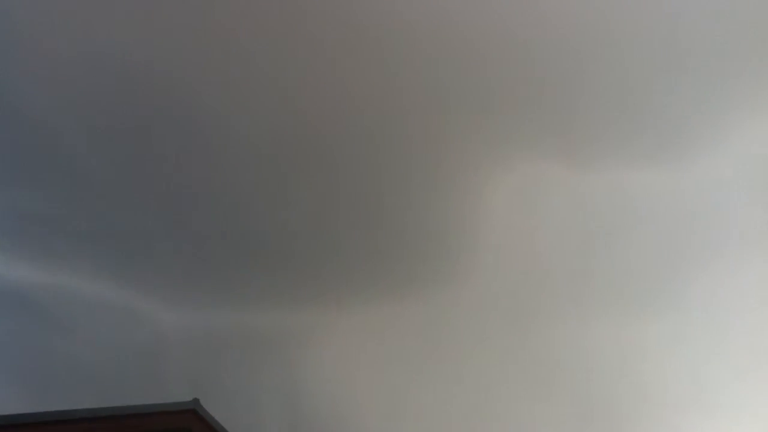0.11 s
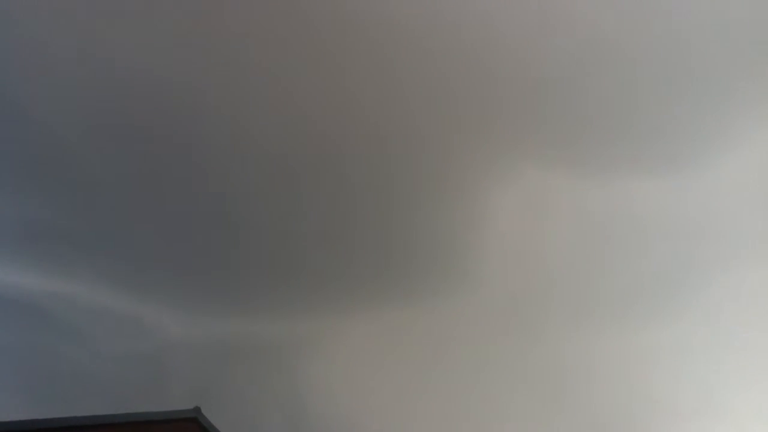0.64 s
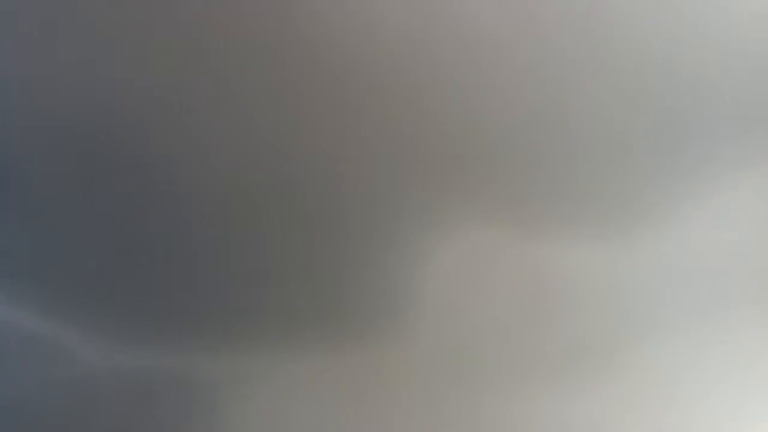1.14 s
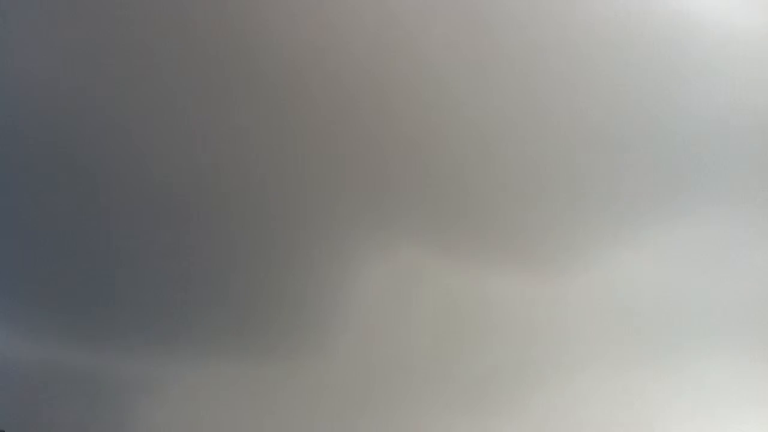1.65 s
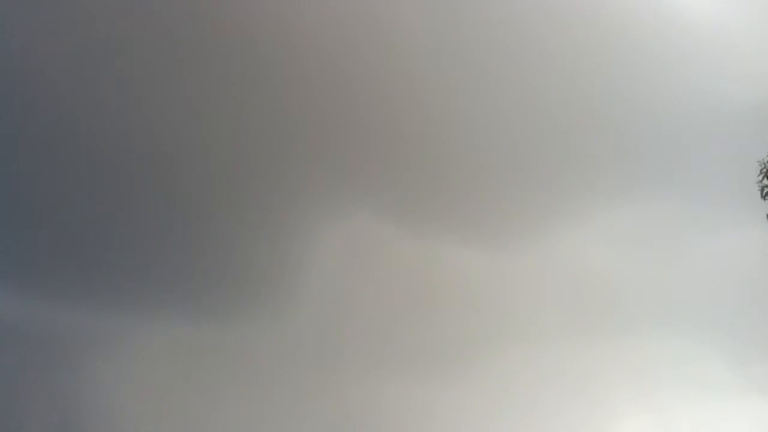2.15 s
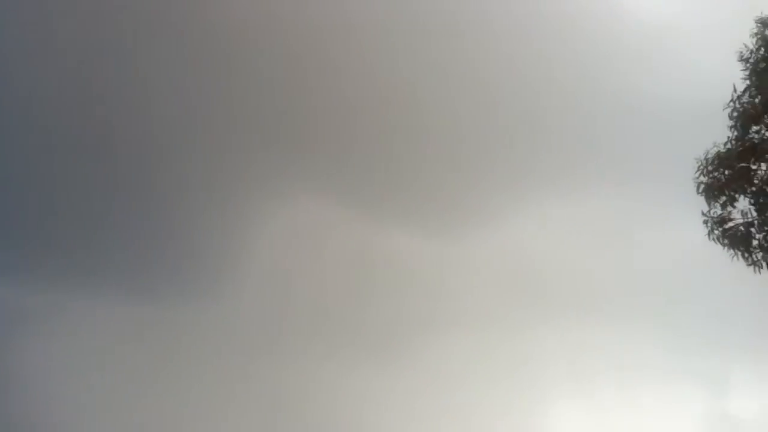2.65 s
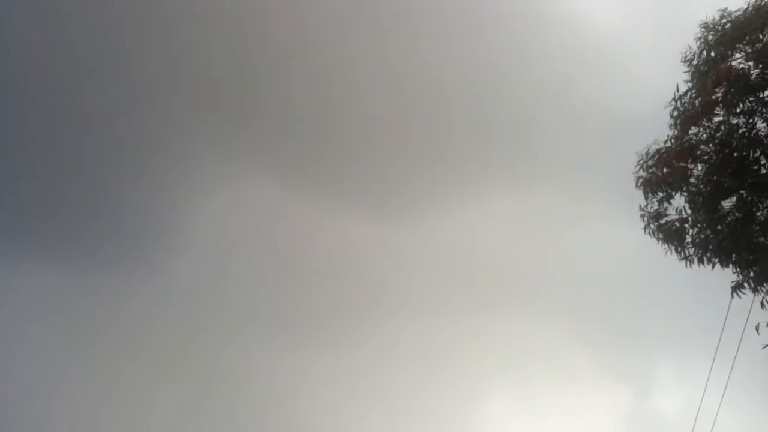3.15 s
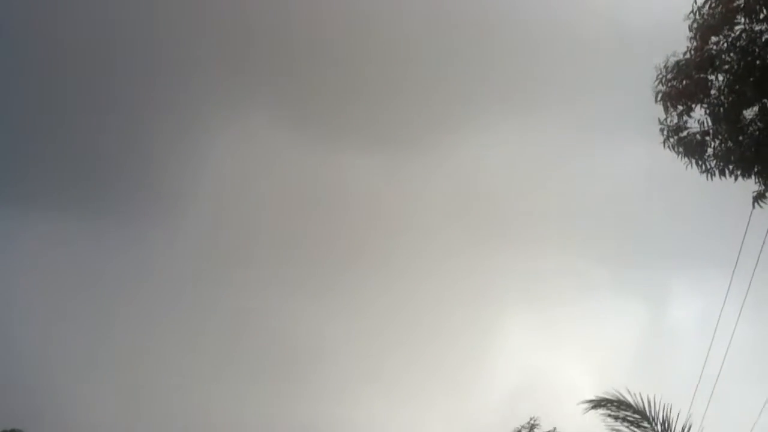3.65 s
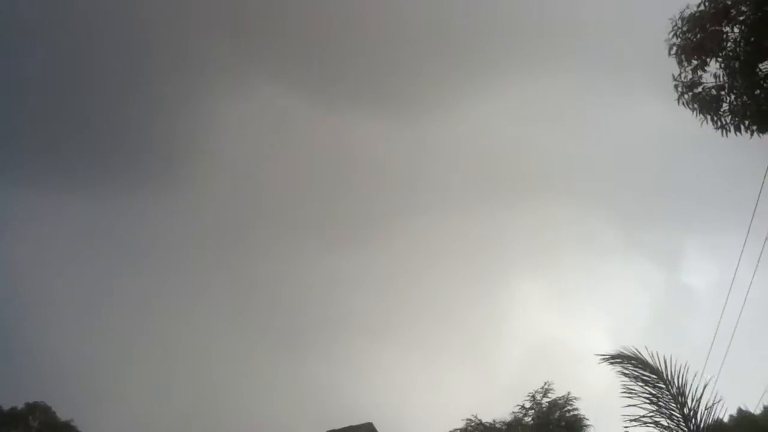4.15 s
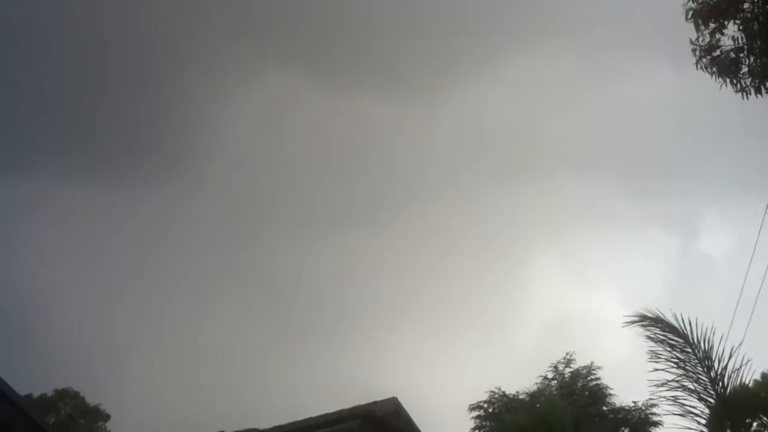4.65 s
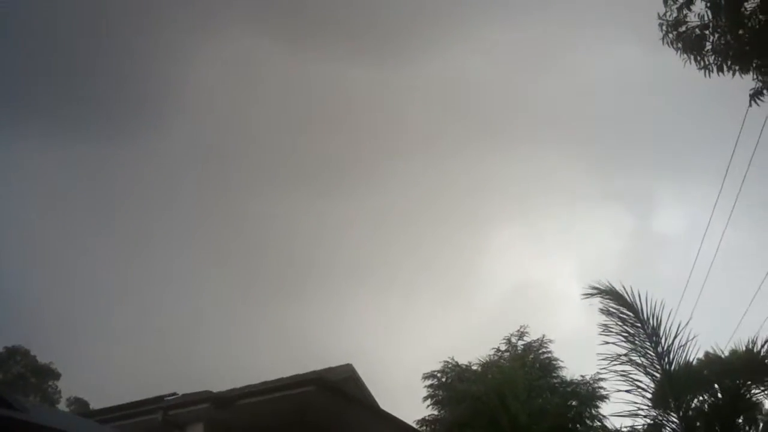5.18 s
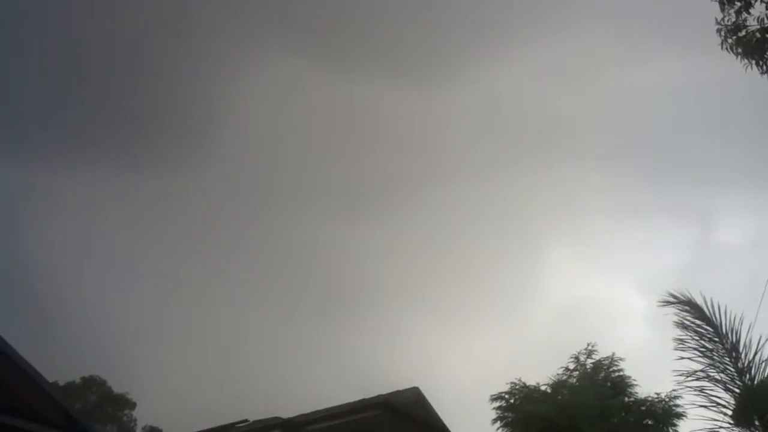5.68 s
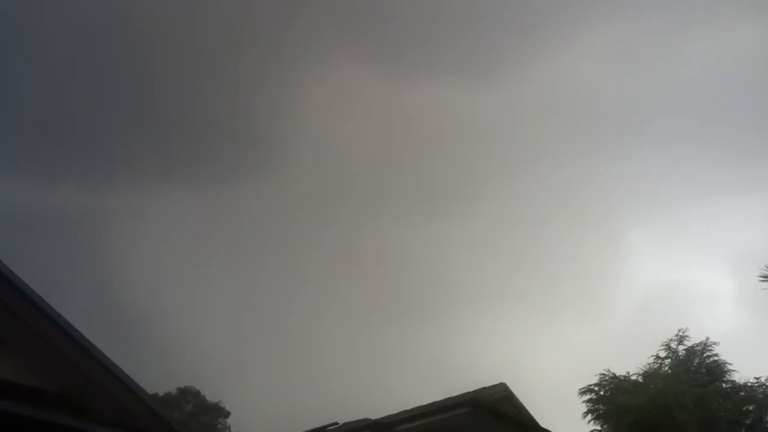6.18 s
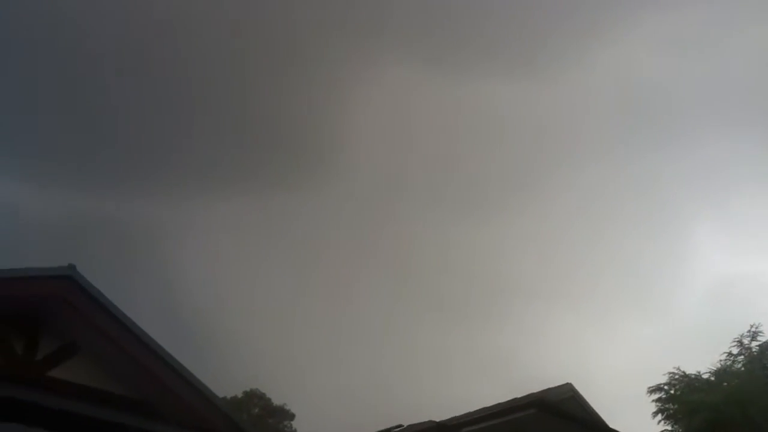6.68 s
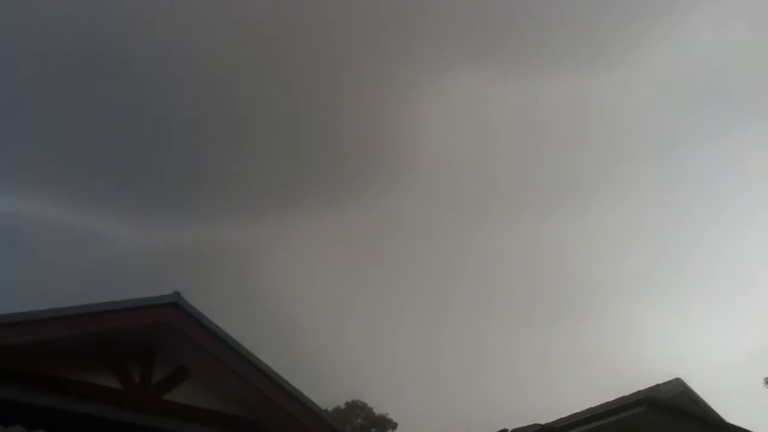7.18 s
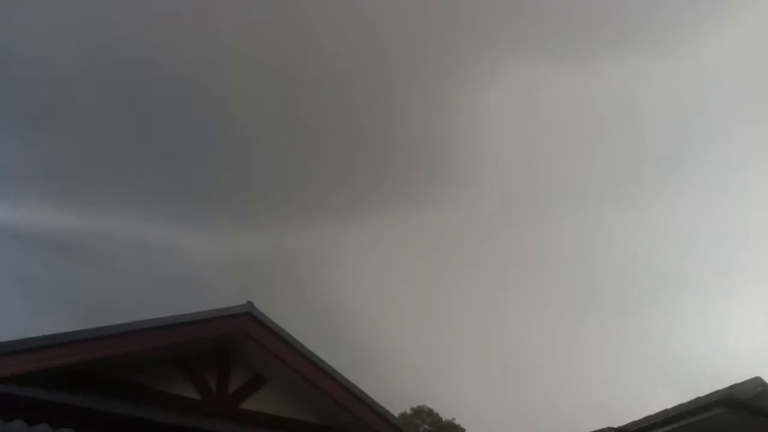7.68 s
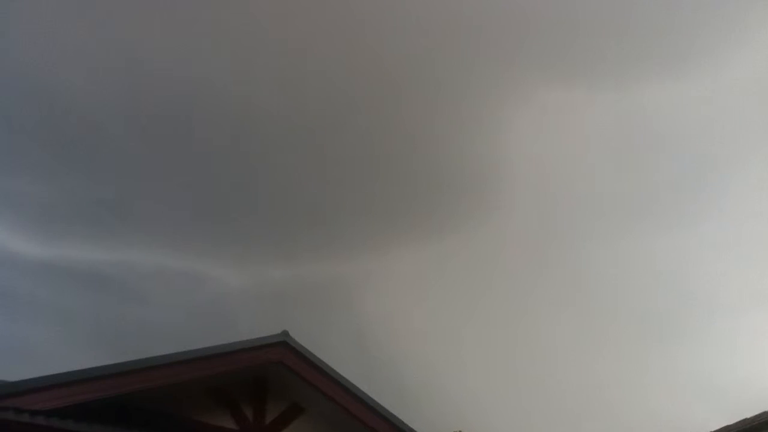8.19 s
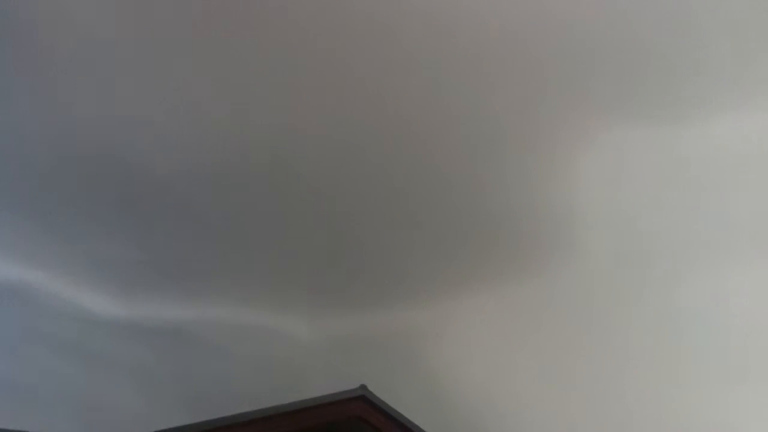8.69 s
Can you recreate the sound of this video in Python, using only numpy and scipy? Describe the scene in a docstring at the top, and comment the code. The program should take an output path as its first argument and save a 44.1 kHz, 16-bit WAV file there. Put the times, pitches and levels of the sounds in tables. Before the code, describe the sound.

Small parrots screech, squawk, whistle and trill in suburban trees while gusty wind rumbles and thumps hard on a bare microphone, then eases.

```python
"""A flock of small parrots in suburban trees, heard through a bare microphone in gusty wind over a traffic hum.
It opens with screeches and squawks under a faint far siren that ends by 1.8 s; whistles, coos and rasps join in.
Gusts, made of sped-up or slowed turbulence, buffet hardest near 3.7 s; a trill and a long rattle follow by 4.3 s.
Then the wind thins, swoops and sparse calls sound, a swish passes at 7.5 s and loud calls return from 8 s.
Clear calls are stacks of gliding harmonics; screeches have staggering pitch and noise; all birds get echoes."""
import sys
import numpy as np
from scipy import signal
from scipy.fft import rfft, irfft
from scipy.io import wavfile
from scipy.ndimage import uniform_filter1d

SR = 44100
rng = np.random.default_rng(int(sys.argv[2]) if len(sys.argv) > 2 else 0)


def field_ratio(decibels):
    """Amplitude ratio for a level in dB (20 dB per decade); scalars and array-likes work."""
    return 10 ** (np.asarray(decibels, dtype=float) / 20)


def master_out(mix):
    """Clip the mix to full scale and print it as 16-bit PCM to the path in sys.argv[1]."""
    frames = np.transpose(np.atleast_2d(mix))
    ceiling = np.clip(frames, -1, 1)
    pcm = np.round(ceiling * 32767).astype(np.int16)
    wavfile.write(sys.argv[1], SR, pcm)


N = 388962


def evened(x):
    """Scales to rms 1."""
    return x / np.sqrt(np.mean(x ** 2) + 1e-20)


def read(points, hz):
    """Reads a spectrum on a log-frequency axis."""
    f, value = np.transpose(points)
    return np.interp(np.log(hz + 1), np.log(f + 1), value)


def columns(rows):
    """Draws a table as curves: returns its start time, then each other column per sample."""
    s, *rest = np.transpose(rows)
    t = np.arange(s[0], s[-1], 1 / SR)
    return [s[0]] + [np.interp(t, s, c) for c in rest]


def add(mix, s, sound):
    """Mixes a sound in at s seconds."""
    at = round(s * SR)
    sound = sound[max(-at, 0):]
    part = mix[max(at, 0):][:len(sound)]
    part += sound[:len(part)]


def faded(size, seconds):
    """Level shape whose fade-in and fade-out last the given seconds together."""
    return signal.windows.tukey(size, min(seconds * SR / size, 1))


def coloured(points, size):
    """Noise of rms 1 with the given spectrum."""
    hz = np.fft.rfftfreq(size, 1 / SR)
    spectrum = rfft(rng.standard_normal(size)) * field_ratio(read(points, hz))
    return evened(irfft(spectrum, size))


def wobble(size, ms):
    """Smooth random curve of about rms 1: noise averaged twice over ms."""
    span = max(round(ms * SR / 1000), 1)
    smooth = uniform_filter1d(uniform_filter1d(rng.standard_normal(size), span), span)
    return smooth * np.sqrt(1.23 * span)


def resonate(x, hz, width):
    """Band-pass: shifts the curve hz down to zero, smooths, and shifts back."""
    turn = np.exp(2j * np.pi * np.cumsum(hz * np.ones(len(x))) / SR)
    r = np.exp(-np.pi * width / SR)
    smooth = signal.lfilter([1 - r], [1, -r], x / turn + 1e-18)
    return 2 * (turn * smooth).real


def partials(hz, size_db, flicker_db, ms):
    """Sums harmonics of the pitch curve at about rms 1; leaves in the path make each one flicker alone."""
    k = np.arange(1, len(size_db) + 1)[:, None]
    size = field_ratio(size_db) * (k * hz < SR / 2.8)  # the highest partials are left out
    chance = np.array([wobble(len(hz), ms) for _ in k])
    flicker = field_ratio(flicker_db * k ** 0.54 * chance)  # higher partials flicker more
    waves = np.cos(2 * np.pi * k * np.cumsum(hz) / SR)
    return (size * flicker * waves).sum(0) / np.sqrt((size ** 2).sum(0) / 2 + 1e-20)


def screech(s, length, peak_db, place, centre_hz, octaves):
    """The syrinx goes chaotic: the pitch staggers about, and ragged air fills the gaps."""
    u = np.linspace(0, 1, round(length * SR))
    size = len(u)
    place = np.clip(place, .02, .98)
    from_peak = np.maximum((place - u) / place, (u - place) / (1 - place))
    db = peak_db - 15.5 * from_peak ** 1.58  # both ends lie 15.5 dB under the peak
    stagger = .2 * wobble(size, 7.6) + 0.0753 * wobble(size, .8)  # octaves
    hz = 1450 * 2 ** np.clip(stagger, -.8, .8)
    k = np.arange(1, 11)[:, None]
    away = np.log2(k * hz / centre_hz) / np.maximum(octaves, .3)
    voice = partials(hz, -12 * away ** 2, 1.2, 3.4)
    air = rng.standard_normal(size)
    for _ in range(2):
        air = resonate(air, centre_hz, 4600 * octaves)
    sound = evened(voice + field_ratio(-7.0) * evened(air))
    return s, field_ratio(db + 1.8 * wobble(size, 11.0)) * sound * faded(size, 0.033)


def screeches():
    """Harsh screeches: bursts of chaotic voice and air, each round its own band."""
    # t/s, length/s, peak level/dB before its wobble, place of the peak (0-1), centre f/Hz, breadth/octaves
    screech_rows = [(0, 0.15, -46.5, 0.05, 4600, 1), (0.156, 0.24, -41, 0.82, 4280, 0.95),
                    (.62, 0.18, -56.5, 0.4, 6960, 0.72), (0.689, 0.16, -50, 0.26, 2600, 0.88),
                    (0.799, 0.3, -52.5, 0.23, 3990, 1.2), (2.779, 0.4, -62, .5, 2280, .5),
                    (1.318, 0.37, -51.5, 0.17, 4900, 0.85), (1.841, 0.16, -48, 0.18, 5200, 0.92),
                    (1.996, 0.27, -46, 0.58, 5300, 0.98), (2.875, 0.54, -59.5, 0.02, 5000, 0.97),
                    (3.301, 0.48, -60.5, 0.18, 4970, .9), (3.598, 0.14, -33, 0.55, 4260, 0.79),
                    (4.117, 0.33, -51, 0, 5100, 1.2), (4.447, 0.14, -47.5, 0.7, 5350, 0.79),
                    (4.615, 0.19, -46.5, 0.9, 4170, 1.15), (5.332, 0.17, -59.5, 0.3, 4700, 0.55),
                    (5.541, 0.11, -47, 0.24, 3680, 1.24), (5.642, 0.14, -46.5, 0.1, 3300, 1),
                    (6.791, 0.31, -56.5, 0.32, 4830, 0.56), (7.324, 0.45, -57.5, 0.06, 4270, 0.85),
                    (7.532, 0.38, -55, 0, 4300, 1.1), (7.968, 0.25, -47, 0.45, 4750, 0.87),
                    (8.346, 0.17, -40.5, 0.43, 4170, 0.92), (8.538, 0.1, -48, 0.23, 4550, 0.98),
                    (8.747, 0.079, -46, 0, 4730, .7)]
    return [screech(*row) for row in screech_rows]


def siren():
    """A far wail: a gliding sine, blurred in pitch and level by echoes and moving air."""
    # t/s, f/Hz, level/dB, both before their wobble
    siren_curve = [(0, 914, -47), (.25, 820, -59.5), (.6, 733, -64), (.85, 769, -62), (1.0, 864, -57),
                   (1.5, 1175, -61.5), (1.75, 1242, -70)]
    s, hz, db = columns(siren_curve)
    size = len(hz)
    tone = np.sin(2 * np.pi * np.cumsum(hz * (1 + 0.0045 * wobble(size, 16))) / SR)
    level = np.sqrt(2) * field_ratio(db + 5.8 * wobble(size, 24))
    return s, level * tone * signal.windows.tukey(size, .1)


def airflow(eddies):
    """Steady turbulence on the microphone, with a restless level."""
    # t/s, level/dB before its wobble
    flow_curve = [(0, -23), (.22, -37), (.37, -33), (.52, -22), (.71, -30.5), (1.28, -45), (1.5, -33.5),
                  (1.79, -41), (2.05, -32.5), (2.33, -40), (2.55, -30.5), (2.95, -40), (3.41, -39.5),
                  (3.71, -31), (3.95, -52), (4.15, -32.5), (4.47, -31.5), (4.9, -48.5), (5.33, -45),
                  (6.1, -62), (6.83, -52), (7.7, -48), (7.98, -44), (8.82, -48)]
    s, db = columns(flow_curve)
    return s, field_ratio(db + 3.42 * wobble(len(db), 19.0)) * eddies[:len(db)]


def buffets(eddies):
    """Gusts sweep eddies past the microphone: faster air plays the turbulence faster, so brighter."""
    # t of the middle/s, level at the crest/dB, length/ms (fades included, 2.2 times this), air speed/factor
    gust_rows = [(0.035, -17, 13, 0.95), (0.128, -21.5, 34, 0.78), (0.192, -29.5, 36, 0.88),
                 (0.255, -33.5, 22, 1.2), (0.4, -16.5, 23, 0.95), (0.449, -17.5, 16.5, 1.2),
                 (0.547, -18, 36, 1.48), (0.658, -25.5, 19.7, 0.86), (0.72, -36, 14.5, 0.98),
                 (0.765, -30, 18, 0.75), (0.827, -25.5, 35, 0.96), (0.892, -26.5, 21, 1.2),
                 (1.005, -26.5, 14.8, 0.93), (1.044, -26, 16.4, 1.05), (1.205, -29, 34, 0.83),
                 (1.43, -29.5, 19.4, 1.37), (1.506, -27, 26, 0.61), (1.562, -26, 16.4, 1.15),
                 (1.663, -31, 31, 1.47), (1.779, -30.5, 42, 0.94), (1.849, -36.5, 20.4, 1.7),
                 (1.897, -24.5, 12, 1.33), (1.974, -18.5, 14.2, 1.07), (2.022, -25, 21, 1.47),
                 (2.135, -14.5, 18, 1.55), (2.416, -19.5, 15.2, 1.51), (2.509, -27, 33, 1.6),
                 (2.604, -13.5, 24, 1.67), (2.704, -22.5, 33, 1.45), (2.806, -26.5, 22, 1.13),
                 (3.037, -32.5, 17, 0.96), (3.114, -26.5, 22, 1.07), (3.195, -17, 15.7, 1.37),
                 (3.222, -18, 15, 0.64), (3.296, -25.5, 15, 0.68), (3.543, -20.5, 13.2, 1.94),
                 (3.643, -17, 101, 1.59), (3.722, -12, 26, 2.7), (3.91, -15, 23, 1.23),
                 (3.972, -31, 28, 1.23), (4.039, -17.5, 25.5, 1.21), (4.154, -25.5, 17.5, 1.56),
                 (4.238, -23, 18.7, 0.6), (4.271, -21, 23.3, 0.97), (4.35, -20.5, 21.4, 1.08),
                 (4.438, -20.5, 13.7, 2.4), (4.525, -29, 30, 1.17), (4.607, -15, 30.6, 1.89),
                 (4.655, -21, 16.5, 1.37), (4.744, -25, 12.9, 1.48), (4.858, -32.5, 15.2, 1.6),
                 (5.034, -37.5, 35, 1.3), (5.586, -38, 12, 0.8), (5.737, -27, 24, 1.61),
                 (6.835, -32, 21, 1.08), (8.541, -40, 15, 1.13)]
    out = np.zeros(N)
    for (s, db, ms, speed), start in zip(gust_rows, rng.random(len(gust_rows))):
        size = round(2.2 * ms * SR / 1000)
        shape = np.hanning(size)
        place = start * N / 2 + speed * np.arange(size)
        air = np.interp(place, np.arange(N), eddies) * shape
        add(out, s - size / 2 / SR, field_ratio(db) * evened(air) * np.sqrt(np.mean(shape ** 2)))
    return out


def pops():
    """Sharp pressure kicks, most inside hard buffets: a short bump with a dip on each side, of random sign."""
    # t/s, level/dB (the crest is 8.5 dB higher), width/ms (standard deviation of the bell)
    pop_rows = [(0.546, -29, 0.85), (2.1373, -20.5, 0.5), (2.5231, -26, 0.64), (2.598, -20.5, 0.44),
                (2.6194, -24, 0.79), (2.662, -27.5, 0.63), (2.6862, -21.5, 0.56), (3.19, -31.5, 0.52),
                (3.5414, -16, 0.83), (3.594, -32, 0.55), (3.6062, -19.5, 0.44), (3.611, -16, 0.61),
                (3.6141, -11, 0.36), (3.6175, -11, 0.41), (3.629, -7.5, 0.59), (3.642, -7.5, 0.62),
                (3.7053, -35, 0.72), (3.7156, -6, 0.48), (3.7213, -6.5, 0.4), (3.726, -10, 0.6),
                (3.89, -38, 0.93), (3.912, -12, 0.46), (4.03, -24, 0.53), (4.161, -39, 0.58),
                (4.195, -41, 0.73), (4.4384, -10.5, 0.36), (4.6057, -15, 0.49), (4.62, -22, 0.36)]
    out = np.zeros(N)
    t = np.arange(-300, 300) / SR
    for (s, db, ms), side in zip(pop_rows, rng.random(len(pop_rows))):
        u = t * 1000 / ms
        kick = (1 - 0.62 * u ** 2) * np.exp(-u ** 2 / 2)
        add(out, s + t[0], np.sign(side - .5) * field_ratio(db + 8.5) * kick)
    return out


def wind():
    """Low, rumbling turbulence shared by the airflow and the buffets, plus the pops."""
    # spectrum of the turbulence: f/Hz, relative level/dB
    eddy_spectrum = [(20, -15), (50, -0.5), (100, 1.5), (170, -4), (300, -17), (600, -39.5), (1200, -50.5),
                     (3000, -83)]
    eddies = coloured(eddy_spectrum, N)
    out = buffets(eddies) + pops()
    add(out, *airflow(eddies))
    return out


def hum():
    """Far traffic and leaves: steady coloured noise, very slightly breathing."""
    # f/Hz, relative level/dB
    hum_spectrum = [(25, -9), (50, -3.5), (100, -6.5), (200, -8), (300, -7.5), (500, -11), (1200, -13.5),
                    (2060, -23.5), (4230, -27), (8000, -33), (12000, -39), (15600, -43)]
    return field_ratio(-48 + 0.058 * wobble(N, 100)) * coloured(hum_spectrum, N)


def street(x):
    """Foliage scatters the calls almost at once; walls and roofs answer with a longer tail."""
    t = np.arange(SR) / SR
    taps = rng.standard_normal((2, SR)) * (rng.random((2, SR)) < .05)  # sparse random echoes
    fall_s, start_s = np.array([[.09], [.55]]), np.array([[.002], [.015]])  # time to fall by 60 dB; first echo
    near, far = taps * field_ratio(-60 * t / fall_s) * (t > start_s)
    tail = field_ratio(-10) * near / np.linalg.norm(near) + field_ratio(-8.5) * far / np.linalg.norm(far)
    return signal.oaconvolve(x, tail)[:N]


def note(s, hz, db, tilt_db, odd_db, jitter):
    """The syrinx gives a slightly unsteady stack of partials, coloured by the throat."""
    # resonance of the throat: f/Hz, relative level/dB
    throat = [(1000, -8), (2500, -4), (5000, 3), (7500, -0.5), (10000, -10.5), (12500, -20), (15500, -29)]
    # catches, where the pitch drops for a moment: t of the middle/s, share of pitch lost
    catch_rows = [(1.87, 0.31), (1.953, 0.085), (1.978, 0.13), (2.191, 0.12), (2.032, .15), (2.061, 0.092),
                  (2.094, 0.131), (2.122, 0.15), (2.239, 0.22), (4.379, 0.28), (4.427, .28), (4.471, 0.26),
                  (4.521, 0.29), (4.597, 0.26), (4.66, 0.3), (4.706, 0.3), (4.499, 0.096), (4.547, 0.12),
                  (4.582, .12), (4.757, .13), (4.79, .12)]
    size = len(hz)
    t = s + np.arange(size) / SR
    catch = np.zeros(size)
    for at, share in catch_rows:
        u = (t - at) * 1000 / (62 * share)  # 62 ms per share lost: deeper catches last longer
        catch += share * np.cos(np.pi * np.clip(u, -.5, .5)) ** 2
    catch = catch * (hz < 2250)  # only the low, rattling voices catch

    # faint birds sit deeper in the foliage: duller, less steady, and they flicker more
    faint_db = max(-49 - np.max(db), 0)
    jitter = jitter * (1 + .2 * faint_db)
    flicker_db = 1.6 + .35 * faint_db
    hz = hz * (1 - catch) * (1 + jitter / 100 * (wobble(size, 2.18) + 0.36 * wobble(size, 0.44)))

    k = np.arange(1, 9)[:, None]
    tilt_db = tilt_db - 15 * catch - 0.2 * faint_db
    odd_db = odd_db - 25 * catch  # a catch doubles the beat of the membranes
    size_db = read(throat, k * hz) + tilt_db * np.log2(k) + odd_db * (k % 2)
    stack = partials(hz, size_db, flicker_db, 2.6)
    return s, field_ratio(db + 16.4 * catch) * stack * faded(size, 0.0013)


def call(s, length, db, change_db, from_hz, to_hz, odd_db=0, *, haste, arch=0, swell_db, tilt_db, jitter):
    """A note glides between two pitches, steadily or fastest at first, as haste sets."""
    # tilt_db: per octave; jitter: % before faintness adds to it
    u = np.linspace(0, 1, round(length * SR))
    done = 1 - (1 - u) ** haste
    effort = 4 * done * (1 - done)
    hz = (from_hz + (to_hz - from_hz) * done) * (1 + arch * effort)  # an optional arch of effort lifts the pitch
    swell = swell_db * (4 * u * (1 - u) - .5)  # a separate swell shapes the level
    return note(s, hz, db + change_db * u + swell, tilt_db, odd_db, jitter)


def squawks():
    """Nasal squawks: bright stacks whose odd partials are raised or held back."""
    # t/s, length/s, level/dB before the swell, change of level/dB, start f/Hz, end f/Hz, odd partials/dB
    squawk_rows = [(.005, 0.029, -47.5, 1, 2120, 2610, 3), (.03, 0.053, -39, -4, 2530, 2503, -6.5),
                   (.085, 0.037, -40, 0.5, 2350, 2334, -24), (.108, 0.023, -46, 2, 2250, 2520, 9),
                   (.129, 0.086, -37, -3.5, 2540, 2417, -0.5), (.208, 0.039, -39, -10, 2290, 2270, -23),
                   (.245, 0.08, -38.5, 0, 2420, 2484, -22), (1.42, 0.093, -55.5, -2, 2735, 2805, -21),
                   (3.7, 0.035, -35, 2.5, 2555, 2560, -8.5), (3.735, 0.028, -33.5, -1, 2440, 2423, -34),
                   (3.77, 0.085, -43, 3, 2400, 2500, -6.5), (3.862, .03, -40.5, 9, 2430, 2490, -20),
                   (3.89, 0.091, -34, -3, 2490, 2620, -40), (3.99, 0.081, -46, -16, 2610, 2600, -34),
                   (4.085, 0.036, -56, 6, 2520, 3100, -23), (4.24, 0.06, -48, 1, 2360, 2490, -5),
                   (5.42, 0.068, -74.5, 3, 2830, 2750, -18), (7.44, 0.13, -67, 3, 2670, 2910, 9),
                   (7.69, 0.12, -64, -1, 2700, 2930, 14), (8.112, 0.079, -44, -7, 2730, 2683, -24),
                   (8.22, .022, -58, -5, 2660, 2670, -21), (8.456, 0.065, -36.5, -5.5, 2930, 2977, -30),
                   (8.52, 0.035, -56, -5, 2990, 2980, -24), (8.562, 0.047, -49.5, 3, 2050, 2420, 0),
                   (8.61, 0.058, -38, -8, 2415, 2387, -6), (8.625, 0.051, -43.5, 10.5, 2320, 2263, -24),
                   (8.765, 0.069, -40, -1, 2240, 2360, -29), (3.587, 0.043, -45.5, -4, 2360, 2950, -1),
                   (8.343, 0.051, -54.5, -8, 2280, 2950, 9), (8.415, .035, -54, 0, 2950, 2650, 12),
                   (.064, .008, -56, -6, 2500, 3300, -4), (.202, 0.0076, -43, -8, 2540, 3580, -14),
                   (3.855, 0.0065, -43.5, -2, 2580, 3320, -2), (8.764, 0.011, -44, -7, 2320, 2970, -7),
                   (8.685, 0.11, -48.5, 8.5, 2306, 2370, -2)]
    return [call(*row, haste=2.5, swell_db=2.5, tilt_db=-6, jitter=.65) for row in squawk_rows]


def whistles():
    """Pure whistles: a steep tilt weakens the overtones."""
    # t/s, length/s, level/dB before the swell, change of level/dB, start f/Hz, end f/Hz
    whistle_rows = [(.36, 0.088, -34, -26, 5935, 5950), (.83, 0.028, -54, 8, 1240, 1560),
                    (.872, 0.025, -49, -3, 1530, 1490), (.912, .02, -59, -6, 1500, 1480),
                    (.868, .05, -56, -6, 4500, 4400), (.98, 0.057, -59, -1, 4380, 4400),
                    (.9, 0.023, -40.5, 3.5, 2615, 2770), (.93, 0.053, -52, 3, 2730, 2690),
                    (.92, 0.073, -51.5, -9, 3710, 3690), (.87, 0.032, -47.5, 5, 2970, 2980),
                    (1.01, 0.083, -52.5, 8.5, 2620, 2463), (1.08, .12, -44.5, -10.5, 2640, 2527),
                    (2.0, 0.086, -49, 6, 2820, 3077), (3.67, 0.039, -50, 4, 2870, 2850),
                    (3.675, 0.024, -49, 2, 6300, 5600), (3.7, 0.13, -32.5, -30, 5830, 5820),
                    (4.172, 0.015, -38, -11, 4520, 4230), (4.203, 0.0098, -35, 5, 4520, 4410),
                    (4.218, 0.024, -34.5, 0, 6120, 6210), (4.222, 0.024, -50, 5, 4600, 4560),
                    (4.255, 0.017, -30.5, 4, 6070, 6185), (4.246, .009, -35, 2, 4100, 5150),
                    (4.272, .005, -36, 2, 6100, 4300), (4.277, 0.043, -30, -20, 4250, 3120),
                    (4.28, 0.062, -55, -11, 6040, 6120), (4.72, 0.063, -52, -4, 2810, 2850),
                    (6.83, 0.15, -74, 9, 4590, 4250), (6.94, 0.067, -63, 3, 5410, 5320),
                    (7.08, 0.077, -74, -5, 5300, 5320), (2.78, 0.056, -66, 0, 4800, 5030),
                    (2.94, 0.045, -66, 0, 4880, 4480), (2.79, 0.03, -63, 7, 2200, 2550),
                    (2.815, .025, -60, 4, 2560, 2060), (2.89, .02, -63, 2, 2380, 2600),
                    (2.93, 0.043, -61, 4, 2650, 2300), (3.0, 0.027, -62, 0, 2380, 1990),
                    (3.055, 0.023, -63, 0, 2320, 1800), (3.09, 0.044, -58.5, 1, 1856, 2100),
                    (.69, 0.02, -47.5, -1, 2280, 3210), (.705, .03, -46.5, 5, 3266, 2270),
                    (.828, 0.021, -50.5, 7, 2400, 3230), (3.1, 0.029, -61, 0, 5700, 6500),
                    (3.125, 0.043, -64, 2, 4350, 4380), (3.195, .04, -70, -2, 5700, 5750),
                    (3.3, 0.026, -63, 0, 4050, 4270), (3.365, .02, -66, 0, 7350, 7040),
                    (3.385, 0.032, -57, -3, 1390, 3120), (3.418, 0.028, -58, 0, 3060, 1520),
                    (5.23, 0.02, -77, 2, 2770, 2780), (7.245, 0.086, -58.5, -5, 2860, 2670),
                    (7.27, 0.049, -60, -4, 5700, 5540), (7.4, 0.089, -68, -5, 4400, 4240),
                    (7.44, .07, -80, -2, 5530, 5500), (7.57, 0.024, -67, -2, 4540, 4540),
                    (7.585, 0.05, -69, -2, 6100, 5750), (7.62, 0.13, -64, -3, 4140, 4260),
                    (7.69, 0.049, -71, -7, 5530, 5440), (7.88, 0.082, -68, -3, 4200, 4380),
                    (8.075, .028, -55, 0, 2150, 1485), (8.168, .035, -52, -3, 2670, 1680),
                    (4.668, 0.0079, -47, 3, 2790, 2314), (4.806, 0.0057, -45, 4, 3560, 2260),
                    (.72, 0.041, -53, -5, 3240, 2290), (7.345, 0.036, -76, -2, 4900, 4800),
                    (7.855, 0.042, -57, 1, 2060, 2150), (8.45, .05, -39, -18, 4520, 4930)]
    return [call(*row, haste=1.3, swell_db=3, tilt_db=-23, jitter=.9) for row in whistle_rows]


def coos():
    """Soft coos: stacks with a fairly steep tilt."""
    # t/s, length/s, level/dB before the swell, change of level/dB, start f/Hz, end f/Hz, odd partials/dB
    coo_rows = [(4.772, .065, -47.5, -8, 3100, 1950, 6), (.622, .06, -50, -3, 2100, 2060, -1),
                (.658, 0.046, -51.5, -1, 1700, 1670, -10), (6.33, .07, -57, -4, 2780, 2620, -2),
                (6.495, 0.079, -55, 0, 1275, 1180, -9), (8.06, 0.059, -56, 0, 2230, 2000, 1),
                (8.04, 0.0933, -67, 10, 2900, 3080, 4)]
    return [call(*row, haste=1.5, swell_db=2.5, tilt_db=-12, jitter=1.2) for row in coo_rows]


def rasps():
    """Low rasps: a shallow tilt keeps the overtones strong."""
    # t/s, length/s, level/dB before swell and catches, change of level/dB,
    # start f/Hz and end f/Hz before catches, odd partials/dB before catches
    rasp_rows = [(1.322, 0.07, -50.5, -2, 1442, 1462, -3), (1.4, .2, -53, -11, 1400, 1420, 0),
                 (1.835, 0.049, -52.5, 6.5, 1980, 2255, 4), (1.887, 0.047, -47.5, 4.5, 1940, 2164, -2),
                 (1.92, 0.056, -41, -3, 1610, 1620, 5), (1.969, 0.013, -48, -3, 1630, 1410, 4),
                 (1.972, 0.034, -48, 2, 2320, 1925, 7), (2.0, 0.075, -48.5, 6, 1990, 2008, 8),
                 (2.02, .12, -44.5, -1, 1404, 1525, 1.5), (2.14, 0.021, -43.5, -1, 1970, 1550, 8),
                 (2.157, 0.044, -42, -6, 1543, 1634, 9), (2.198, 0.043, -38, -8.5, 1673, 1345, 3),
                 (2.243, 0.039, -42, -19, 1387, 1370, 1), (3.318, 0.025, -53, 0, 1510, 1660, -8),
                 (4.093, 0.039, -55, 10, 1300, 1580, -1), (5.6, 0.084, -54, 8, 1476, 1457, -6),
                 (5.68, 0.038, -53, -6, 1900, 1650, 4), (7.972, 0.014, -60, -3, 1310, 1500, -6),
                 (7.987, .13, -48.5, -5, 1536, 1460, 1), (8.115, .06, -51, -5, 1477, 1440, 4),
                 (8.345, .03, -55.5, 3.5, 1203, 1460, 0), (8.375, 0.08, -48, 4, 1500, 1395, 0)]
    return [call(*row, haste=2.6, swell_db=1.5, tilt_db=-1.5, jitter=.9) for row in rasp_rows]


def trill():
    """A fast trill: each chip sweeps up, jumps to a high squeak and slides off it."""
    # t/s, level/dB before the swell, length/ms
    chip_rows = [(4.128, -35, 17), (4.158, -34, 13), (4.192, -33.5, 13), (4.211, -33, 13)]
    voice = dict(haste=1, swell_db=2, tilt_db=-20, jitter=.8)
    notes = []
    for s, db, ms in chip_rows:
        up = 0.54 * ms / 1000  # the sweep's share of the chip, in seconds
        notes.append(call(s, up, db, -1, 4270, 5100, **voice))
        notes.append(call(s + up, ms / 1000 - up, db - 4, -5, 6000, 5700, **voice))
    return notes


def rattle():
    """One long call of wandering pitch, broken into a rattle by its catches."""
    # t/s, f/Hz and level/dB before catches
    rattle_curve = [(4.29, 1940, -40), (4.325, 1710, -47.5), (4.42, 1710, -47.5), (4.5, 1850, -48.5),
                    (4.575, 2000, -47), (4.61, 1830, -42.5), (4.695, 1884, -46), (4.75, 1850, -41.5),
                    (4.81, 1900, -50)]
    return [note(*columns(rattle_curve), tilt_db=-2.5, odd_db=2.5, jitter=1.6)]


def swoops():
    """Swooping notes: effort arches the pitch up by a third of its value and back."""
    # t/s, length/s, level/dB before the swell, change of level/dB, start f/Hz, end f/Hz
    swoop_rows = [(5.548, 0.058, -50.5, 0, 1850, 1833), (5.658, 0.087, -51, -1, 1900, 1843),
                  (6.78, 0.037, -67, 15, 2194, 1780), (8.122, 0.047, -50, 3, 2510, 2160)]
    voice = dict(odd_db=3, haste=1.7, arch=.33, swell_db=2.5, tilt_db=-8, jitter=3)
    return [call(*row, **voice) for row in swoop_rows]


def flutter():
    """A thin hiss of wings passing: one short airy swish of band-passed noise."""
    s, length, db, hz, width = 7.525, .05, -53, 8000, 6000  # seconds, dB at the crest, Hz; width per pass
    size = round(length * SR)
    air = rng.standard_normal(size)
    for _ in range(2):
        air = resonate(air, hz, width)
    return [(s, field_ratio(db) * evened(air) * np.hanning(size))]


def scene():
    """Birds with their echoes, siren, wind and hum."""
    birds, far = np.zeros((2, N))
    for family in screeches, squawks, whistles, coos, rasps, trill, rattle, swoops, flutter:
        for s, sound in family():
            add(birds, s, sound)
    add(far, *siren())
    mix = birds + street(birds) + far + wind() + hum()
    return mix[None] * faded(N, 0.00065)


def low_pass(x):
    """Removes everything above the highest recorded frequency."""
    return signal.sosfilt(signal.butter(12, 15700, fs=SR, output="sos"), x)


def record(dry):
    """The microphone cuts the deepest bass and softly saturates on the hardest buffets."""
    cut = signal.lfilter(*signal.butter(2, 55, "high", fs=SR), dry)
    return low_pass(0.89 * np.tanh(cut / 0.8))


dry = scene()
out = record(dry)
master_out(out)
```